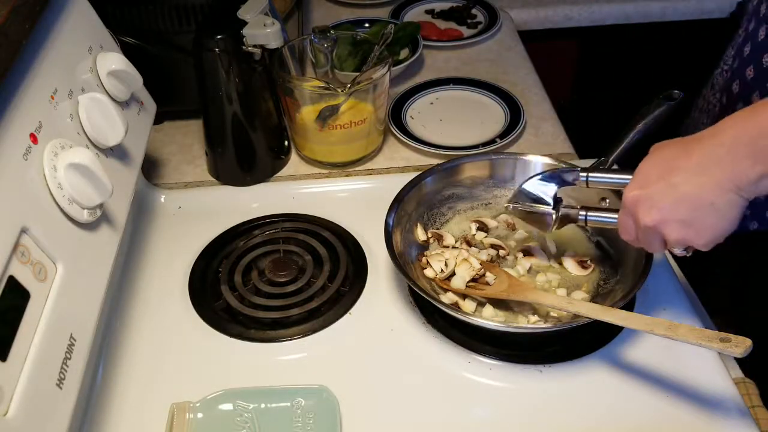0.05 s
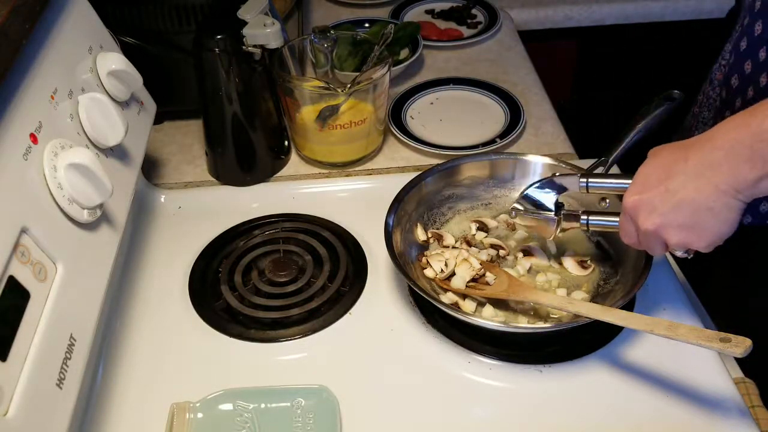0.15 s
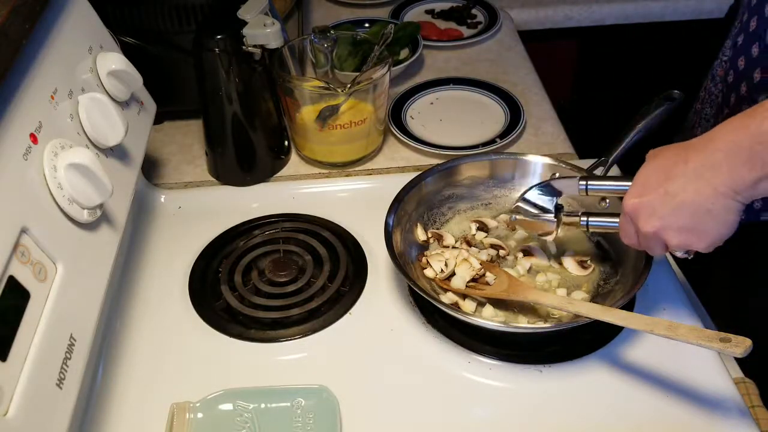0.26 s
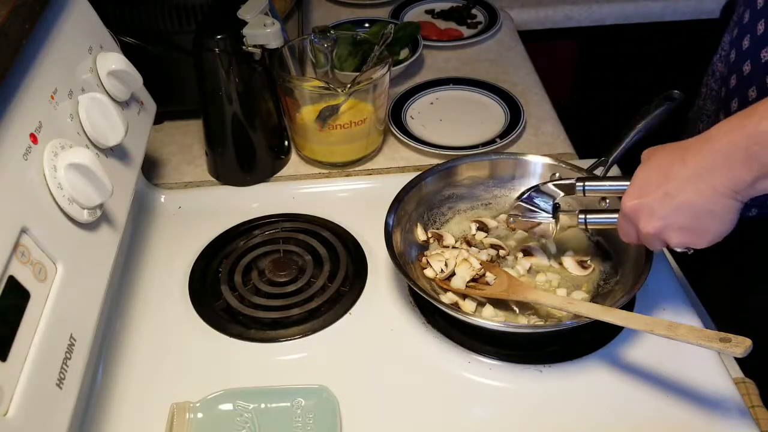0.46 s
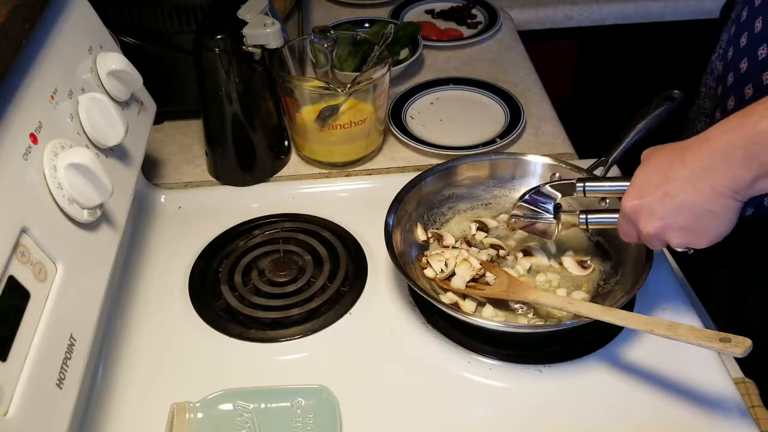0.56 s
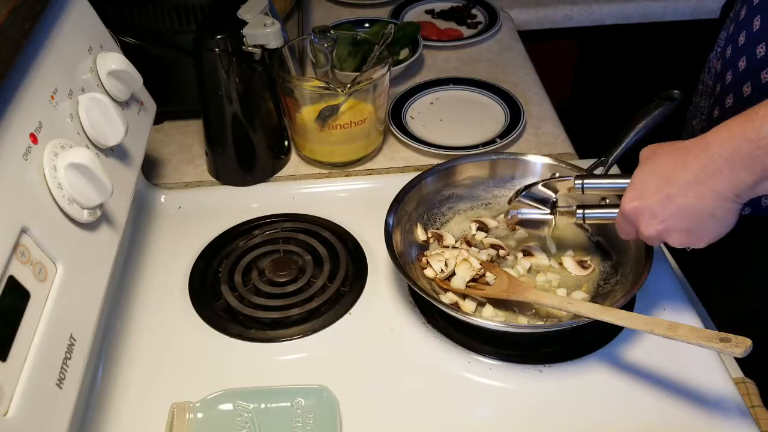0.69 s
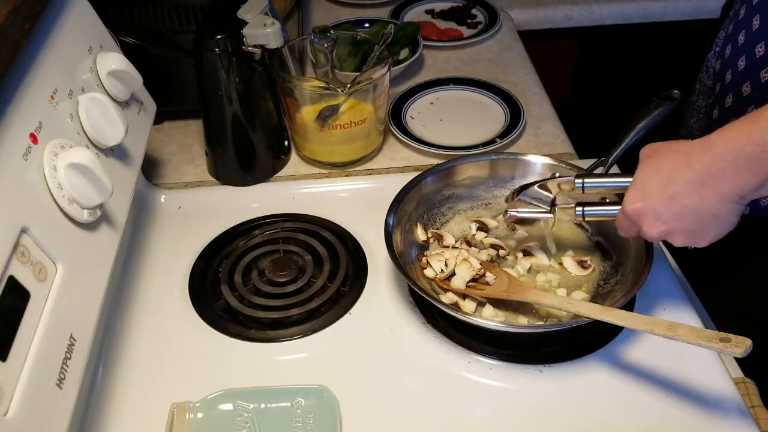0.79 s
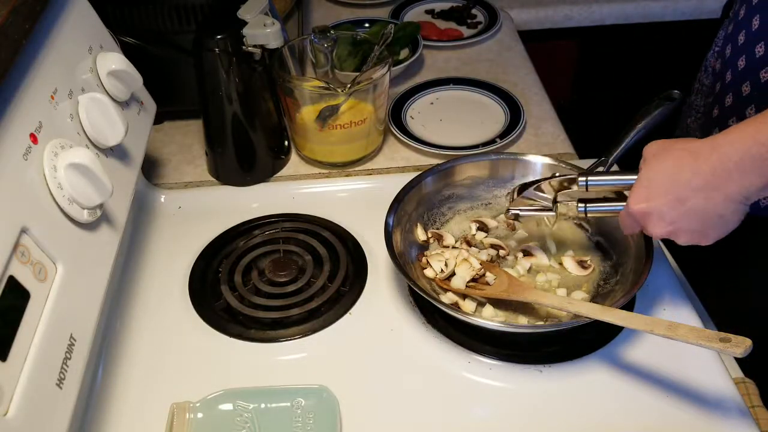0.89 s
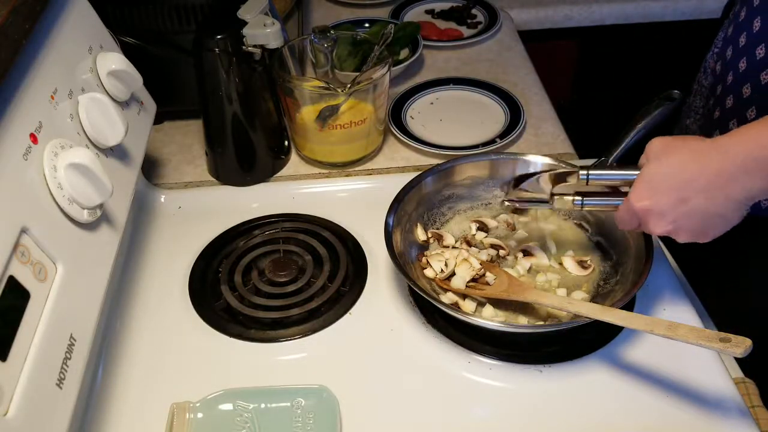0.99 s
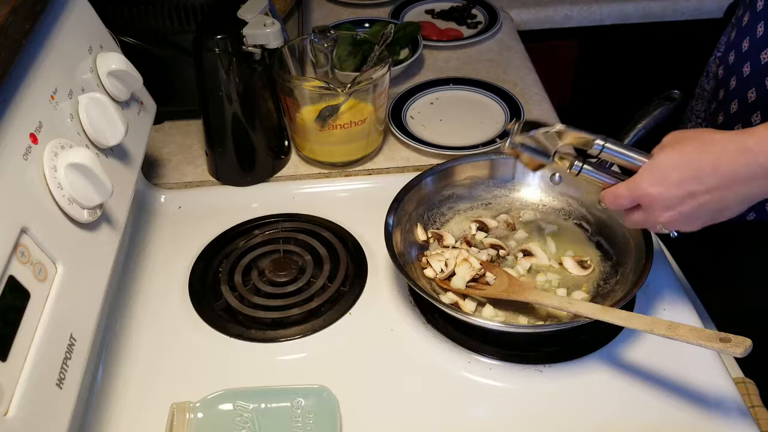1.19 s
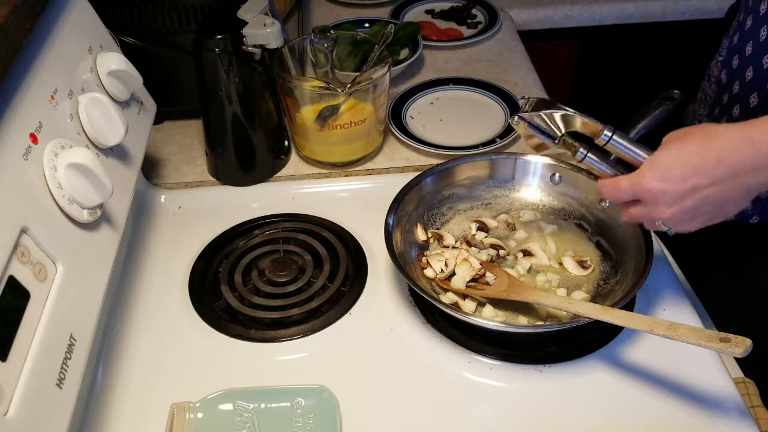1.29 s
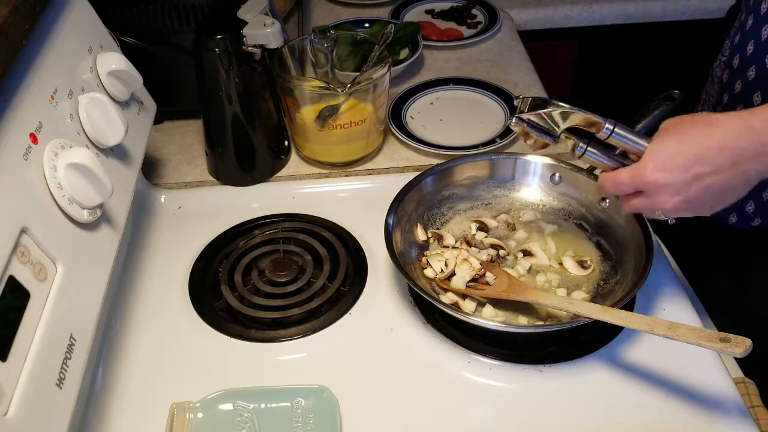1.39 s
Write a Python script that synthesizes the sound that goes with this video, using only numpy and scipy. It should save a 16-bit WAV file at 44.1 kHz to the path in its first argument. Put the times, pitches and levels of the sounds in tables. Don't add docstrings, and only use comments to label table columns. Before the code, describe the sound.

A metal garlic press clinks on a steel pan in a small kitchen, heard close in stereo. Its hinge hisses and sings faintly around 0.1 s; a quick scrape swells from 0.21 s into a hard, bright, rattling clink at 0.25 s. The pan dies quickly; the press shimmers until gripped near 0.8 s. Tiny sizzling ticks continue to about 1 s, a faint squeaky rustle comes at 1.23 s, over low fridge hum.

```python
import sys
import numpy as np
from scipy import signal
from scipy.fft import rfft, irfft, next_fast_len
from scipy.io import wavfile
from scipy.ndimage import uniform_filter1d, map_coordinates

SR = 44100
rng = np.random.default_rng(int(sys.argv[2]) if len(sys.argv) > 2 else 0)


def field_ratio(decibels):
    return 10 ** (np.asarray(decibels, dtype=float) / 20)


def unload_audio(sound):
    columns = np.transpose(np.atleast_2d(sound))
    steps = np.round(np.clip(columns, -1, 1) * 32767)
    wavfile.write(sys.argv[1], SR, steps.astype(np.int16))


N = 63945
T = np.arange(N) / SR
CLINK_S, PAN_RISE_S = 0.2515, 0.004
CHATTER, CHATTER_HZ = 0.95, 200
HIT_ALIKE = 0.15


def unit(x):
    return x / np.sqrt(np.mean(x ** 2) + 1e-20)


def along(points, hz):
    f, v = np.transpose(points)
    return np.interp(np.log(hz + 1), np.log(f + 1), v)


def curve(rows):
    s, db = np.transpose(rows)
    return field_ratio(np.interp(T, s, db, left=-140, right=-140))


def noise(gain, alike):
    m = next_fast_len(N + 8192)
    hz = np.fft.rfftfreq(m, 1 / SR)
    turn = np.arccos(np.clip(alike(hz), -1, 1)) / 2
    spectra = rfft(rng.standard_normal((2, m))) * gain(hz)
    mid, side = irfft(spectra * [np.cos(turn), np.sin(turn)], m)[:, :N]
    return unit(np.array([mid + side, mid - side]))


def shaped(spectrum, alike):
    return noise(lambda hz: field_ratio(along(spectrum, hz)), lambda hz: alike + 0 * hz)


def resonance(f, centre_hz, width_hz):
    return 1 / (1 + (2 * (f - centre_hz) / width_hz) ** 2)


def strike(start_s, rise_s, t60_s):
    t = np.maximum(T - start_s, 0)
    return (1 - np.exp(-t / rise_s)) * field_ratio(-60 * t / t60_s)


def tone(hz, pan_db, rough=0, rough_hz=CHATTER_HZ, lead_rad=None):
    start_rad = rng.uniform(0, 2 * np.pi)
    random_lead_rad = 1.05 * rng.choice([-1, 1])
    lead_rad = random_lead_rad if lead_rad is None else lead_rad
    side = np.array([[0.5], [-0.5]])
    real, imaginary = rng.standard_normal((2, 2, int(T[-1] * rough_hz) + 4))
    knots = real + 1j * imaginary
    shake = np.array([np.interp(T * rough_hz, np.arange(len(k)), k) for k in knots])
    size = (1 + rough * shake) / np.sqrt(1 + rough ** 2)
    phase = 2 * np.pi * hz * T + start_rad + side * lead_rad
    return np.sqrt(2) * field_ratio(side * pan_db) * (size * np.exp(1j * phase)).imag


def fridge():
    # centre in Hz, width in Hz, level in dB.
    hum_bands = [(57, 16, -69.5), (81.5, 7.3, -64), (118, 21, -73.5), (119.6, 4.4, -52.5),
                 (172.2, 3.7, -65), (202.2, 3, -58.5), (238.2, 13, -63), (303, 15, -74), (415.3, 2, -69),
                 (469.5, 16, -71.5)]
    # frequency in Hz, level in dB per Hz.
    rumble_spectrum = [(12, -50.5), (20, -1), (38, -19), (103, -0.5), (163, -13.5), (215, -3), (357, -14.5),
                       (592, -14.5), (1000, -34.5), (1300, -76.5), (2200, -120)]
    # frequency in Hz, level in dB per Hz.
    hiss_spectrum = [(530, -58.5), (900, -8), (1520, -1.5), (1660, -0.5), (2030, -2), (2710, -8.5),
                     (7570, -1), (9060, -13), (15700, -6)]
    # time in seconds, hiss level in dB.
    hiss_level = [(0, -58.5), (.9, -66.5), (1.1, -67), (1.21, -67), (1.26, -65.5), (1.42, -67),
                  (1.45, -60.5)]
    # frequency in Hz, left-right likeness from -1 to 1.
    likeness = [(60, 1), (180, 0.99), (550, 0.57), (1650, 0.04), (4970, -0.46), (15000, -0.32)]
    alike = lambda hz: along(likeness, hz)
    hum = 0
    for hz, width_hz, db in hum_bands:
        hum = hum + field_ratio(db) * noise(lambda f: resonance(f, hz, width_hz), alike)
    rumble = field_ratio(-54) * noise(lambda hz: field_ratio(along(rumble_spectrum, hz)), alike)
    hiss = curve(hiss_level) * noise(lambda hz: field_ratio(along(hiss_spectrum, hz)), alike)
    return hum + rumble + hiss


def ticks():
    # start in seconds, snap in dB, puff in dB, puff t60 in seconds.
    spit_rows = [(.001, -77, -41.5, 0.037), (.147, -65, -72, 0.028), (0.201, -50, -78, 0.029),
                 (.355, -80, -55, 0.18), (0.448, -63, -55.5, 0.32), (0.485, -55, -58.5, 0.39),
                 (0.545, -67, -64, 0.053), (0.596, -66, -65, 0.21), (.686, -72, -64, 0.29),
                 (.746, -59, -65, 0.074), (0.7792, -45, -65, 0.14), (.79, -64, -64, 0.041),
                 (0.9466, -49, -54, 0.07), (.98, -78, -61.5, 0.097)]
    # frequency in Hz, level in dB per Hz.
    spit_spectrum = [(1500, -40), (3000, -16), (4500, -16), (6200, -5), (7500, -7), (9000, -11), (11500, 0),
                     (15800, -6)]
    envelope = 0
    for start_s, snap_db, puff_db, puff_t60_s in spit_rows:
        envelope = envelope + field_ratio(snap_db) * strike(start_s, 0.0002, 0.014)
        envelope = envelope + field_ratio(puff_db) * strike(start_s, 0.0013, puff_t60_s)
    return envelope * shaped(spit_spectrum, 0.33)


def hinge():
    mode_hz = [1378, 2284, 3408, 4700, 5986, 6708, 8113, 11490, 12540]
    mode_db = [-7, 0, -17, -7, -10, -14, -18, -22, -20]
    mode_pan_db = [-2.5, 6.5, -1, 3, 6, -0.5, 1, 1.5, 1.5]
    # time in seconds, singing level in dB.
    sing_level = [(.015, -76), (.033, -66), (.081, -52), (.115, -55), (.2, -71), (.212, -66), (.216, -47),
                  (.234, -52), (.242, -62)]
    # time in seconds, friction hiss level in dB.
    hiss_level = [(0.0, -44), (0.014, -55.5), (0.066, -47.5), (0.12, -65.5), (0.154, -80), (0.18, -92.5),
                  (0.2, -62)]
    # frequency in Hz, hiss level in dB per Hz.
    hiss_spectrum = [(530, -50.5), (900, -22.5), (2010, -23.5), (2260, -15), (3780, -20.5), (4630, -17.5),
                     (15700, -24.5)]
    sing = 0
    for hz, db, pan_db in zip(mode_hz, mode_db, mode_pan_db):
        fade_db = 0.9 * hz * np.clip(T - 0.09, 0, 0.06) / 20
        late_db = -25 * (T > 0.2) * (db < max(mode_db))
        sing = sing + field_ratio(db - fade_db + late_db) * tone(hz, pan_db, rough=0.7, rough_hz=60)
    sing = field_ratio(7) * curve(sing_level) * sing / np.sqrt(2)
    hiss = field_ratio(-2) * curve(hiss_level) * shaped(hiss_spectrum, 0.056)
    drag_start_s, drag_len_s, drag_db = 0.01, 0.22, -58
    swell = np.sin(np.pi * np.clip((T - drag_start_s) / drag_len_s, 0, 1)) ** 0.5
    drag = field_ratio(drag_db) * swell * noise(lambda f: resonance(f, 720, 200), lambda hz: 0.25 + 0 * hz)
    return sing + hiss + drag


def scrape():
    # time in seconds, pressure in dB.
    pressure = [(.209, -65), (.214, -49), (.222, -39.5), (.232, -35.5), (.241, -28), (.25, -32),
                (.258, -24.5)]
    # centre in Hz, width in Hz, level in dB.
    bands = [(4300, 8100, -2.5), (6200, 470, 12), (8430, 863, -10), (11700, 1300, -7), (14700, 1800, 11),
             (16860, 146, -6.5)]

    def gain(f):
        total = 0
        for centre, width, db in bands:
            total = total + field_ratio(db) * f * width / (centre * centre - f * f + 1j * f * width)
        return np.abs(total)

    return curve(pressure) * noise(gain, lambda hz: HIT_ALIKE + 0 * hz)


def rattle():
    # frequency in Hz, level in dB per Hz.
    blow_spectrum = [(120, -40.5), (200, -7.5), (1030, -12), (1290, -8.5), (3390, -13), (5350, -10.5),
                     (7030, -15), (7430, -29.5), (15700, -3.5)]
    # frequency in Hz, level in dB per Hz.
    tail_spectrum = [(410, -36), (700, -18), (1960, -14), (2470, -8.5), (3130, -17), (5690, -16),
                     (10400, -22), (11300, -14), (15700, -29)]
    blow_t60_s, bounce_db = 0.13, -12
    blows = strike(CLINK_S, 0.0021, blow_t60_s) + field_ratio(bounce_db) * strike(0.273, 0.00138, blow_t60_s)
    blow = field_ratio(-22) * blows * shaped(blow_spectrum, HIT_ALIKE)
    spacing_hz = 150
    knots_db = 3.5 * rng.standard_normal(int(SR / spacing_hz))
    crowd = lambda hz: field_ratio(along(tail_spectrum, hz) + map_coordinates(knots_db, [hz / spacing_hz]))
    tail = field_ratio(-34.5) * strike(CLINK_S, 0.0042, 0.54) * noise(crowd, lambda hz: 0.13 + 0 * hz)
    return blow + tail


def press_rings():
    mode_hz = [1669, 1770, 2516, 2817, 4076, 4146, 5001, 5840, 7622, 7930, 9464, 11114, 11510, 13691]
    # level in dB, t60 in seconds, left-right in dB at the blow, left-right in dB once turned.
    modes = [(-42.5, 0.56, 14, -5.5), (-49, 0.64, -1, 8), (-38.5, 0.98, 4.5, -10.5), (-46.5, 0.84, 13, 7),
             (-42, 0.54, 13, -16), (-44, 0.81, -5.5, 15.5), (-50.5, 0.64, -1.5, 9), (-36, 0.75, 3, -6),
             (-34.5, 0.72, 4.5, 2), (-34, .4, 0, -5), (-45, 0.56, 0.5, -14.5), (-28.5, 0.36, 6, -12),
             (-37, 0.44, 2, -13), (-24, 0.25, -1.5, 1)]
    lag_s = [0, 0, .006, 0, 0, 0, 0, .009, .002, 0, .002, .008, .002, .003]
    beats = {0: (4.2, .272, .272, .85), 7: (3.6, .595, .63, .97), 8: (5, .555, .555, .6),
             11: (2, .48, .55, .85)}
    swings = {0: (.5, 0, .3, .1), 2: (.8, .2, .28, .1), 4: (.6, 2, .3, .3), 5: (-2.4, -6.2, .45, .35),
              6: (.5, -1.4, .3, .13), 7: (-.7, -.4, .3, .1), 8: (-2.6, -6, .39, .08), 9: (2.6, 1, .4, .1),
              10: (-2.3, -.2, .37, .08), 11: (0, 3.3, .31, .13), 12: (1, -2, .31, .1),
              13: (3.1, 1.5, .28, .06)}
    turned = np.clip((T - CLINK_S) / 0.15, 0, 1)
    chatter = 0.09 + CHATTER * field_ratio(-60 * np.maximum(T - CLINK_S, 0) / 0.3)
    out = 0
    for k, (hz, (db, t60_s, first_db, last_db)) in enumerate(zip(mode_hz, modes)):
        rate_hz, *quiet, depth = beats.get(k, (0, 1, 1, 0))
        quiet_s = np.array(quiet)[:, None]
        deepening = depth * np.clip((T - CLINK_S) / (quiet_s - CLINK_S), 0, 1)
        beat = np.abs(1 - deepening * np.exp(2j * np.pi * rate_hz * (T - quiet_s)))
        lead_rad = None
        if k in swings:
            first_rad, last_rad, start_s, len_s = swings[k]
            lead_rad = np.interp(T, [start_s, start_s + len_s], [first_rad, last_rad])
        pan_db = first_db + (last_db - first_db) * turned
        ring = tone(hz, pan_db, chatter, lead_rad=lead_rad)
        out = out + field_ratio(db) * beat * strike(CLINK_S + lag_s[k], 0.004, t60_s) * ring
    return out


def pan_rings():
    mode_hz = [610, 1285, 2044, 2284, 4506, 5460, 6606, 7462, 8526, 9240, 12328, 12944, 14279, 15700]
    # level in dB, t60 in seconds, left-right in dB.
    modes = [(-34, 0.078, -5.5), (-30, 0.21, 2), (-33.5, 0.053, 18.5), (-27.5, 0.035, -13.5),
             (-23.5, 0.056, 16), (-24.5, 0.15, -7.5), (-38.5, 0.24, 15.5), (-29, 0.27, -7),
             (-26.5, 0.16, -6.5), (-40, 0.19, -8), (-30.5, .15, -15.5), (-26, 0.17, -12),
             (-30.5, 0.14, -5.5), (-29.5, 0.07, -2.5)]
    lag_s = [.006, .003, .008, .007, 0, .006, 0, 0, .003, .004, 0, .002, 0, 0]
    out = 0
    for hz, lag, (db, t60_s, pan_db) in zip(mode_hz, lag_s, modes):
        out = out + field_ratio(db) * strike(CLINK_S + lag, PAN_RISE_S, t60_s) * tone(hz, pan_db, CHATTER)
    return out


def hopper_rings():
    # frequency in Hz, level in dB, t60 in seconds, left-right in dB.
    modes = [(10900, -40, 0.023, -6.5), (11470, -37.5, 0.065, -1), (11250, -26, 0.11, -1.5),
             (13500, -36.5, .12, -3.5), (14970, -39.5, 0.11, -4), (15370, -41.5, .1, -0.5)]
    out = 0
    for hz, db, t60_s, pan_db in modes:
        out = out + field_ratio(db) * strike(CLINK_S, PAN_RISE_S, t60_s) * tone(hz, pan_db, CHATTER)
    return out


def clink():
    grit_db, grit_per_s = 3.5, 450
    knots = rng.standard_normal(int(T[-1] * grit_per_s) + 4)
    grit = field_ratio(grit_db * np.tanh(map_coordinates(knots, [T * grit_per_s])))
    grip_s, grip_db_per_s = 0.8, 80
    grip = field_ratio(-grip_db_per_s * np.maximum(T - grip_s, 0))
    return (scrape() + rattle()) * grit + (press_rings() + pan_rings() + hopper_rings()) * grip


def squeak():
    start_s, len_s, start_hz, rise_hz = 1.232, 0.06, 1980, 280
    u = np.clip((T - start_s) / len_s, 0, 1)
    phase = 2 * np.pi * np.cumsum(start_hz + rise_hz * u) / SR
    slow = uniform_filter1d(uniform_filter1d(rng.standard_normal((2, N)), size=90), size=90)
    rough = 1 + 0.9 * unit(slow)
    cry = field_ratio(-75) * np.sin(np.pi * u) ** 0.5 * rough * np.sin(phase)
    spectrum = [(800, -23.0), (2200, 3), (4500, -12), (9000, -4), (15800, -6)]  # (Hz, dB per Hz)
    rustle = field_ratio(-66.5) * strike(start_s, 0.004, 0.43) * shaped(spectrum, 0.3)
    return cry + rustle


def kitchen(x):
    t60_s, delay_samples = 0.28, 200
    tail = rng.standard_normal((2, SR // 3)) * field_ratio(-60 * T[:SR // 3] / t60_s)
    tail = tail / np.linalg.norm(tail[0])
    late = np.pad(x.mean(0), (delay_samples, 0))
    return signal.fftconvolve(late[None], tail, axes=1)[:, :N]


def scene():
    near = ticks() + hinge() + clink() + squeak()
    return near + field_ratio(-13) * kitchen(near) + fridge()


def band_limit(x):
    return signal.sosfilt(signal.butter(12, 16720, fs=SR, output="sos"), x)


def record(dry):
    top_hz, steepness = 15790, 600
    m = next_fast_len(N + 4096)
    hz = np.fft.rfftfreq(m, 1 / SR)
    mix = irfft(rfft(dry, m) / (1 + (hz / top_hz) ** steepness), m)[:, :N]
    return band_limit(mix)


dry = scene()
out = record(dry)
unload_audio(out)
```